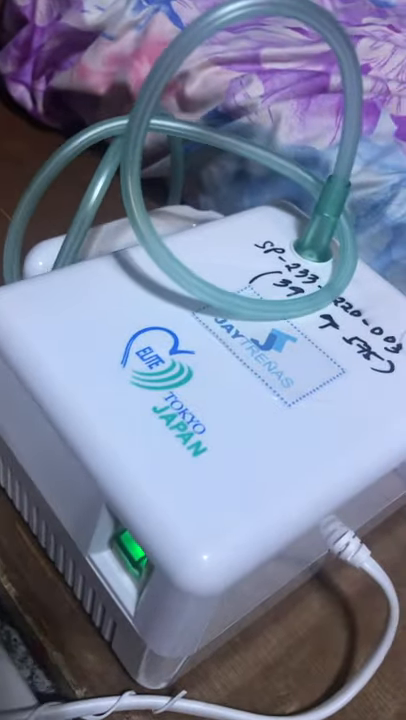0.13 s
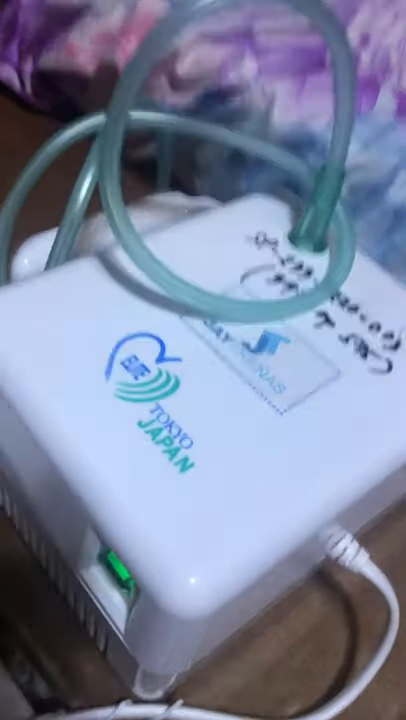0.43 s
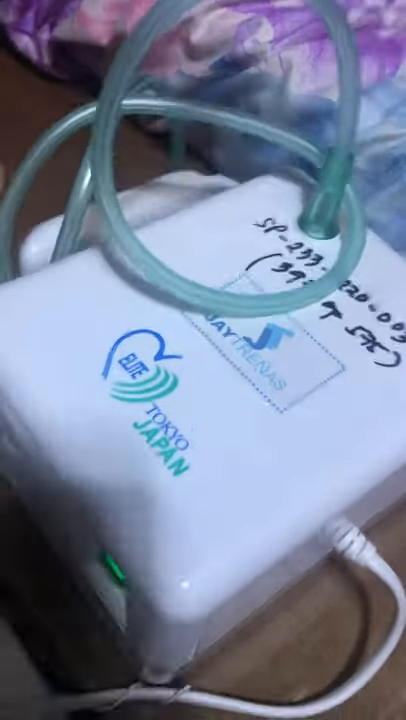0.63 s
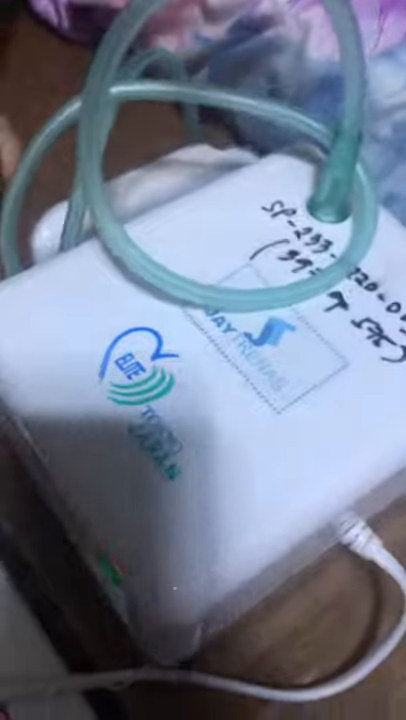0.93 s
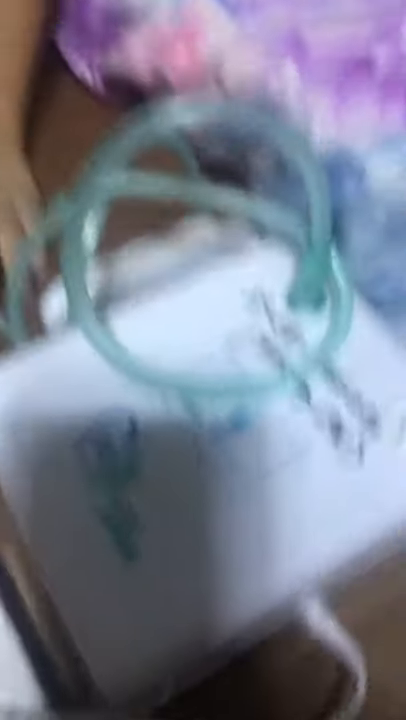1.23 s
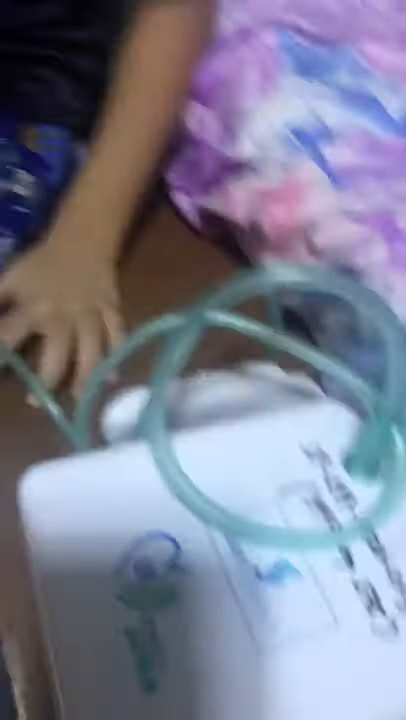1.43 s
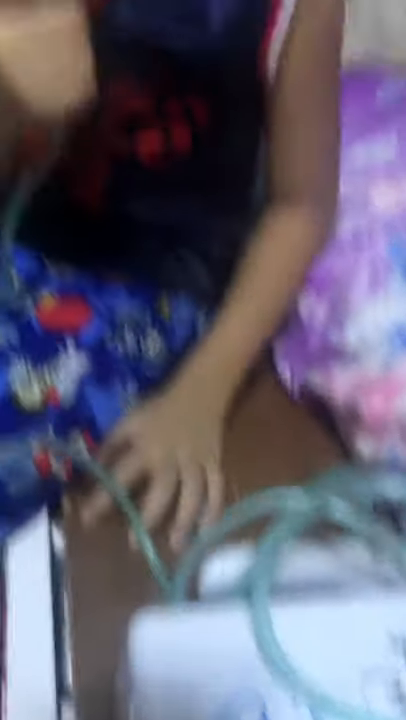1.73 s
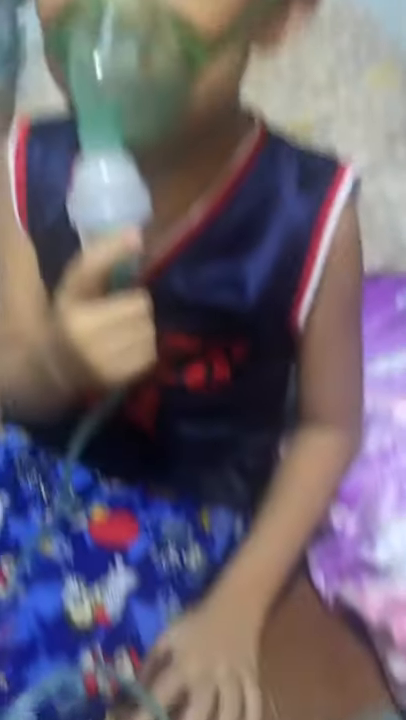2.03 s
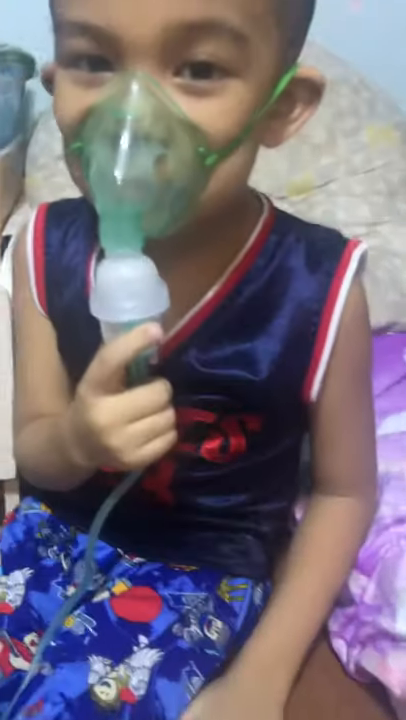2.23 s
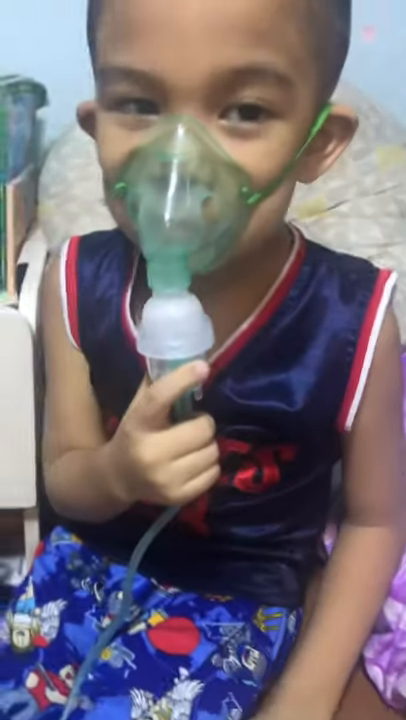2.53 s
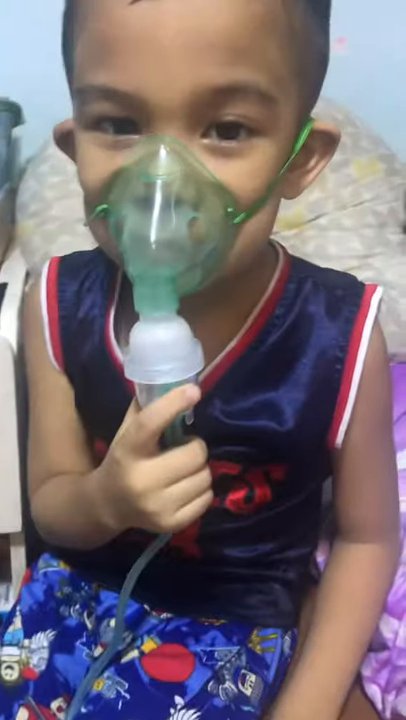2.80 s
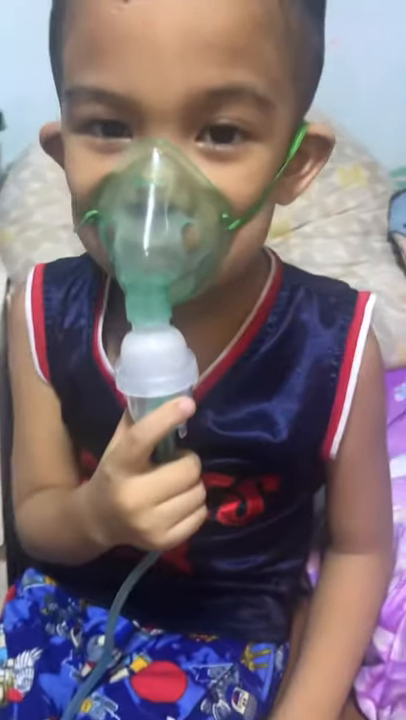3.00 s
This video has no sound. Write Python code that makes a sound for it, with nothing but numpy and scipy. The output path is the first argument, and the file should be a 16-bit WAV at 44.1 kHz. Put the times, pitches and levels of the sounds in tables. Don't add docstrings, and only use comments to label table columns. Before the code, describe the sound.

Steady buzzing drone of a nebulizer pump, easing slightly as thin airy mask hiss comes forward

```python
import sys
import numpy as np
from scipy import signal
from scipy.fft import rfft, irfft
from scipy.io import wavfile
from scipy.ndimage import uniform_filter1d

SR = 44100
rng = np.random.default_rng(int(sys.argv[2]) if len(sys.argv) > 2 else 0)


def file_out(sig):
    cols = np.atleast_2d(sig).T
    lim = np.clip(cols, -1, 1)
    pcm = np.round(lim * 32767).astype(np.int16)
    wavfile.write(sys.argv[1], SR, pcm)


def boost_factor(decibels):
    exponent = np.asarray(decibels, float) / 20
    return 10 ** exponent


N = 139356
t = np.arange(N) / SR

SHAFT_HZ, MAINS_HZ = 50.905, 119.9
PANEL_ORDER = 17

# t/s, pump level/dB, case panel ring/dB, bright part of the puff/dB
PHONE_PATH = [(0, -32, -4.5, -0.5), (.42, -32, -2.5, -1), (.67, -31.5, -2, 0.5), (.78, -32, -4.5, 0.5),
              (.93, -31.5, 1, 0.5), (1.05, -31.5, 0.5, 2.5), (1.261, -31.5, -.6, 1.5),
              (1.34, -32, -1.5, 2.1), (1.43, -32, 3, 2.5), (1.61, -32.5, 1.3, 1.5), (1.82, -33.5, 0.7, 0),
              (1.94, -34.5, 4.5, 0), (2.28, -35.5, -3, -2), (2.5, -35.5, -1, 1), (2.82, -35, -4.5, -4),
              (2.95, -36, 0, 3), (3.16, -35, -7, 3)]
# shaft multiple, level/dB
ORDERS_ABOVE = [(1, -11), (2, -4.5), (3, -4.5), (4, -17), (5, -3), (6, -5), (7, -11), (8, -4), (9, -10),
                (10, -5), (11, -7.5), (12, -13), (13, -1), (14, -8.5), (15, -32), (16, -15), (17, 5),
                (18, -34.5), (19, -24), (20, -12.5), (21, -39), (22, -11), (23, -9), (24, -11.5),
                (25, -17.5), (26, -13.5), (27, -20.5), (28, -20.5)]
# shaft multiple, level/dB
ORDERS_BESIDE = [(1, -14.5), (2, -6), (3, -5.5), (4, -17), (5, -3.5), (6, -5), (7, -12.5), (8, -3),
                 (9, -12), (10, -8.5), (11, -9), (12, -11), (13, 1), (14, -9.5), (15, -42), (16, -13),
                 (17, 2.5), (18, -29), (19, -15), (20, -12), (21, -36), (22, -13.5), (23, -15.5), (24, -25),
                 (25, -46), (26, -20), (27, -26), (28, -27)]
# shaft multiple added to the magnet hum, level above/dB, level beside/dB
MAGNET_LINES = [(0, -31, -26), (1, -24.5, -22.5), (12, -20.5, -55), (17, -15, -8.5), (18, -12, -23),
                (19, -39, -17.5), (21, -22, -28.5)]
STRIKES = [
    (3, .223, .43, .43),
    (10, .127, .94, .07),
    (15, 0, .03, .73),
    (99, .077, .56, .23),
]
# f/Hz, level/dB per Hz
PUFF_COLOUR = [(1500, -3.5), (3900, -1.5), (4800, -7), (6800, -3.5), (11000, -6.5), (12300, -25),
               (13600, 9), (16000, 6.5)]
# f/Hz, level/dB per Hz
HISS_COLOUR = [(20, -16), (80, -10.5), (300, -7.5), (900, 0.5), (1600, -12), (4000, -17), (6000, -24),
               (15000, -20)]
# f/Hz, level/dB per Hz
JET_COLOUR = [(1500, -18), (3800, -8), (6000, -15), (7200, -6), (11300, -8.5), (12100, -15), (13600, -1),
              (16000, 1.5)]
# f/Hz, width/Hz, level/dB
INTAKE_PIPE = [(3990, 100, -23), (8230, 1350, -15.5), (10070, 250, -22), (11070, 520, -21)]
# f/Hz, width/Hz, level/dB
REED_RING = [(1760, 210, 5.5), (2720, 1300, 0), (3250, 1230, -1.5), (5540, 4600, 9.5), (1400, 83, -4.5)]
# moment/turn, level/dB
RATTLE_KNOCKS = [
    (0.048, -8.5),
    (.22, -19),
    (.46, -2),
    (.66, 2),
]
# f/Hz, width/Hz, level/dB
RATTLE_RING = [(2310, 240, -1.5), (2800, 300, 7), (3124, 110, 0), (3715, 50, 6), (4150, 140, -3.5)]
# f/Hz, width/Hz, level/dB, faces the phone at t/s, swell/s
WHISTLES = [
    (8330, 295, -33.5, 2.03, 0.081),
    (9937, 200, -36.5, 2.11, 0.27),
    (5346, 260, -51, 1.83, 0.17),
    (7070, 410, -50.5, 1, 0.081),
]
# f/Hz, width/Hz, level/dB, faces the phone at t/s, swell/s
EDGE_TONE = (15700, 220, -47, 2.25, .15)


def unit(x):
    return x / np.sqrt(np.mean(x ** 2))


def step(x):
    return 1 / (1 + np.exp(-np.clip(x, -40, 40)))


def cosine(turns):
    return np.cos(2 * np.pi * turns)


def walk(rate):
    hold = int(SR / rate)
    held = np.repeat(rng.standard_normal(N // hold + 1), hold)
    return 0.97 * uniform_filter1d(uniform_filter1d(held, hold), hold)[:N]


def ring(x, hz, width):
    return signal.lfilter(*signal.iirpeak(hz, hz / width, fs=SR), x)


def clicks(turns, db):
    at = np.clip(turns / SHAFT_HZ * SR, 0, N - 2)
    out, i = np.zeros(N), at.astype(int)
    np.add.at(out, i, boost_factor(db) * (1 - at + i))
    np.add.at(out, i + 1, boost_factor(db) * (at - i))
    return out


def air(colour, flicker_db):
    f = np.maximum(np.fft.rfftfreq(N, 1 / SR), 1)
    hz, db = np.array(colour, float).T
    level = np.interp(np.log(f), np.log(hz), db, left=-60, right=-60)
    spectrum = rfft(rng.standard_normal(N)) * boost_factor(level)
    out = 0
    for octave in range(4, 15):
        share = np.clip(1 - abs(np.log2(f) - octave), 0, 1)
        out = out + irfft(spectrum * share, N) * boost_factor(flicker_db * walk(11.4))
    return unit(out)


def pump_hiss():
    return boost_factor(-5.5) * air(HISS_COLOUR, 1.8)


def mist_mask(turn, beside):
    out = air(JET_COLOUR, 1.0) * boost_factor(-37.5 - 4.5 * (1 - beside))
    throb = 1 + 0.076 * cosine(2 * turn - 0.6) + 0.08 * cosine(turn - 0.1)
    for hz, width, db, at, over in [*WHISTLES, EDGE_TONE]:
        noise = rng.standard_normal(N)
        tone = unit(ring(ring(noise, hz, 1.3 * width), hz, 0.9 * width))
        facing = step((t - at) / over)
        out = out + tone * throb * facing * boost_factor(db + 0.6 * walk(9))
    return out


def magnet_hum(turn, beside):
    out = 0
    for order, above_db, beside_db in MAGNET_LINES:
        db = above_db + (beside_db - above_db) * beside + 0.75 * walk(3.4)
        tone = cosine(round(order) * turn + MAINS_HZ * t + rng.random())
        out = out + np.sqrt(2) * boost_factor(db) * tone
    return out


def panel_buzz(panel_db):
    buzz = ring(rng.standard_normal(N), PANEL_ORDER * SHAFT_HZ, 60)
    return unit(buzz) * boost_factor(panel_db - 14.5)


def shaft_hum(turn, beside, panel_db):
    wander_db, slip_depth, lag_turns = 1.77, 0.05, 0.01
    out = 0
    for (order, above_db), (_, beside_db) in zip(ORDERS_ABOVE, ORDERS_BESIDE):
        order = round(order)
        at, odd, even = next(strike[1:] for strike in STRIKES if order <= strike[0])
        start = (odd if order % 2 else even) - order * lag_turns * beside
        wander = wander_db * min(order / 12, 1) * walk(7.1)
        if order == PANEL_ORDER:
            db = panel_db + 5 + 0.77 * wander
        else:
            db = above_db + (beside_db - above_db) * beside + 1.5 + wander
        slip = 1 + slip_depth * min(order / 17, 1) * cosine(MAINS_HZ * t - 2 * turn)
        out = out + boost_factor(db) * slip * cosine(order * (turn - at) + start)
    return out


def intake(turn, beside, bright_db):
    opens, shuts, rise, fall = 0.585, 0.79, 0.012, 0.022
    share, count = turn % 1, turn.astype(int)
    late, strength = rng.standard_normal((2, count[-1] + 1))
    opening = step((share - opens - late[count] / 100) / rise)
    gate = opening * step((shuts - share) / fall)
    noise = rng.standard_normal(N)
    pipe = sum(boost_factor(db) * unit(ring(noise, hz, width)) for hz, width, db in INTAKE_PIPE)
    puff = (air(PUFF_COLOUR, 0.52) + 1.5 * pipe) * gate
    puff = puff * boost_factor(5 - beside + 1.0 * strength[count])
    treble = signal.butter(2, 9500, "high", fs=SR, output="sos")
    puff = puff + (boost_factor(bright_db) - 1) * signal.sosfiltfilt(treble, puff)
    return puff + boost_factor(2 - 2.8 * beside) * pipe


def valve_ticks(turn, beside):
    jitter_s, reed_scatter_db, rattle_scatter_db = 0.00002, -2, 1.8
    turns = int(turn[-1]) + 1
    jitter, strength = rng.standard_normal((2, turns))
    whole = np.arange(turns) + jitter_s * SHAFT_HZ * jitter
    snaps = clicks(whole + 0.92, reed_scatter_db * strength)
    reed = 0
    for hz, width, db in REED_RING:
        reed = reed + boost_factor(db) * unit(ring(ring(snaps, hz, 1.5 * width), hz, 1.5 * width))
    knocks = 0
    for at, db in RATTLE_KNOCKS:
        knocks = knocks + clicks(whole + at, db + rattle_scatter_db * rng.standard_normal(turns))
    rattle = sum(boost_factor(db) * unit(ring(knocks, hz, width)) for hz, width, db in RATTLE_RING)
    return boost_factor(-13 + 0.5 * beside) * (unit(reed) + boost_factor(-3) * unit(rattle))


def scene():
    turn = SHAFT_HZ * t
    beside = step((t - 1.85) / 0.2)
    path = np.array(PHONE_PATH, float).T
    pump_db, panel_db, bright_db = [np.interp(t, path[0], column) for column in path[1:]]
    pump = pump_hiss() + magnet_hum(turn, beside) + panel_buzz(panel_db)
    pump = pump + shaft_hum(turn, beside, panel_db)
    pump = pump + intake(turn, beside, bright_db) + valve_ticks(turn, beside)
    return (mist_mask(turn, beside) + pump * boost_factor(pump_db))[None]


def low_pass(x):
    return signal.sosfilt(signal.butter(12, 17100, fs=SR, output="sos"), x)


def record(dry):
    rumble_cut = signal.butter(1, 15, "high", fs=SR, output="sos")
    top_cut = signal.ellip(12, 0.3, 75, 15780, fs=SR, output="sos")
    mix = signal.sosfilt(top_cut, signal.sosfilt(rumble_cut, dry))
    return low_pass(mix)


dry = scene()
out = record(dry)
file_out(out)
```